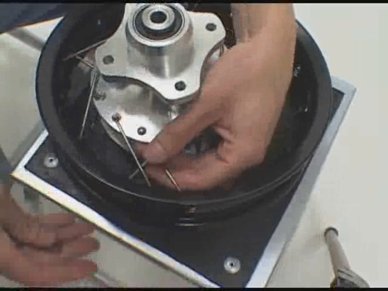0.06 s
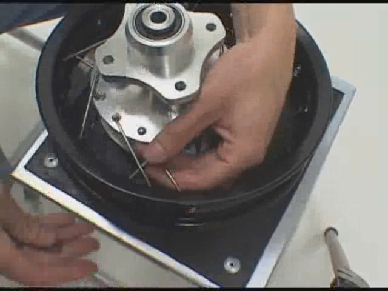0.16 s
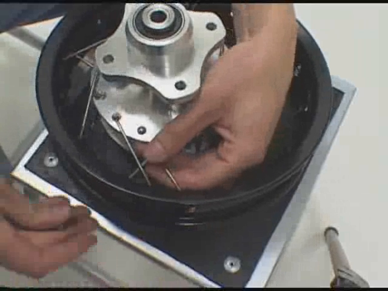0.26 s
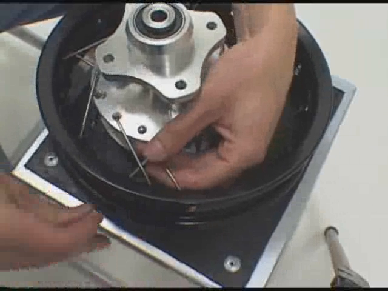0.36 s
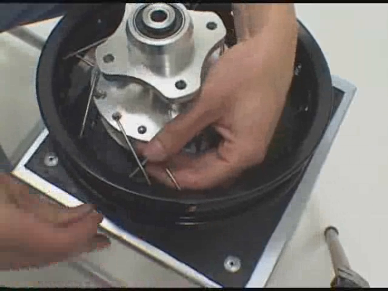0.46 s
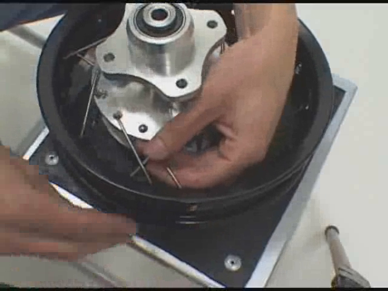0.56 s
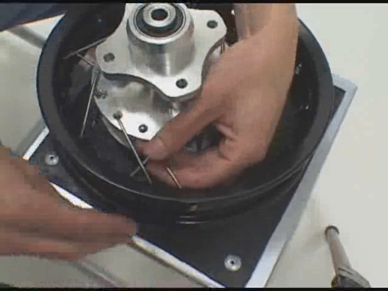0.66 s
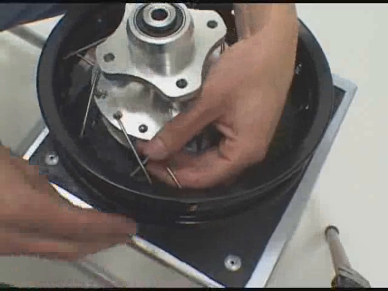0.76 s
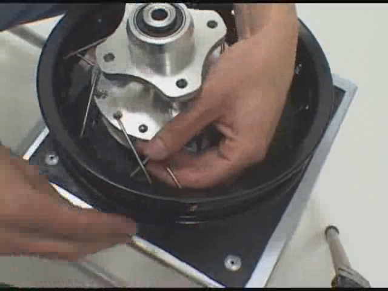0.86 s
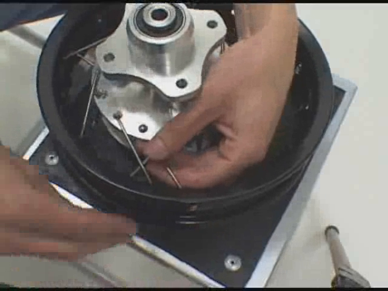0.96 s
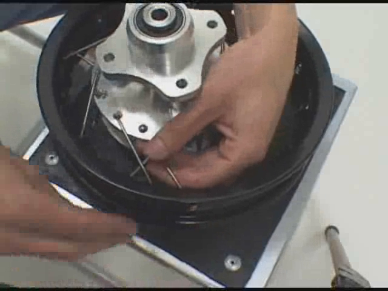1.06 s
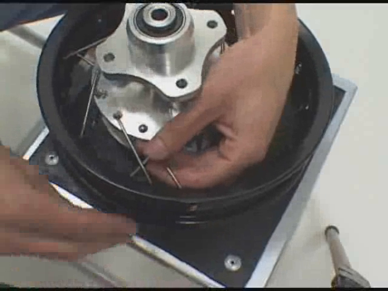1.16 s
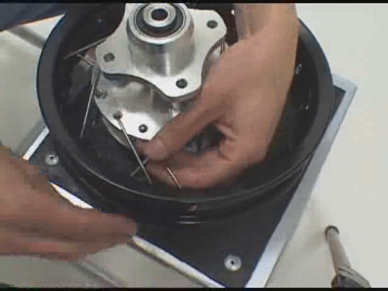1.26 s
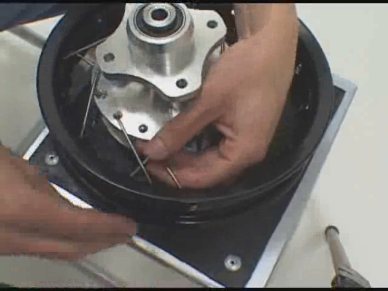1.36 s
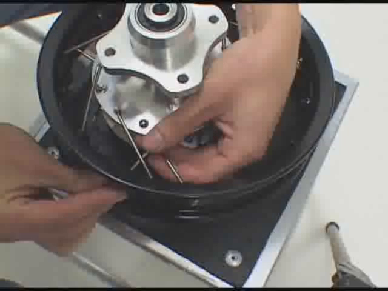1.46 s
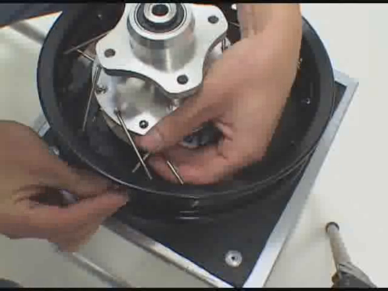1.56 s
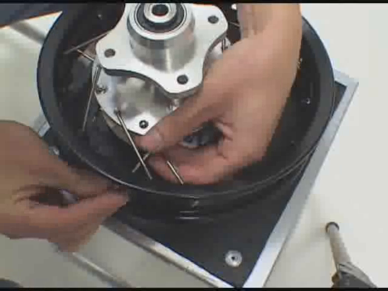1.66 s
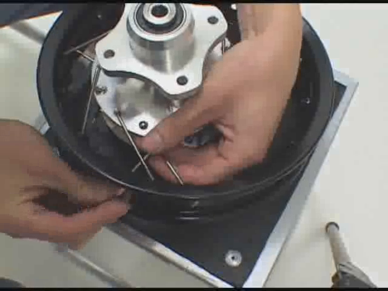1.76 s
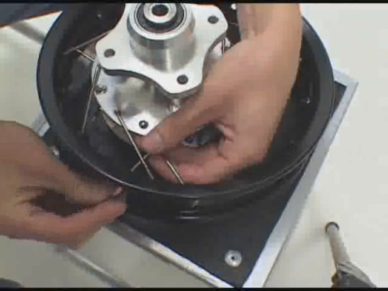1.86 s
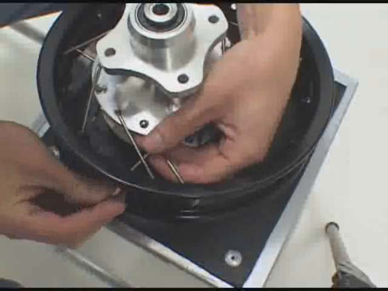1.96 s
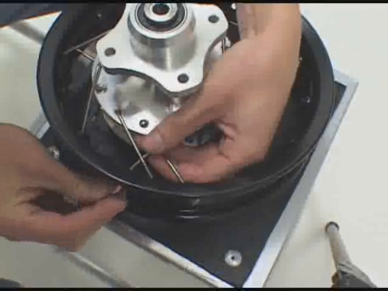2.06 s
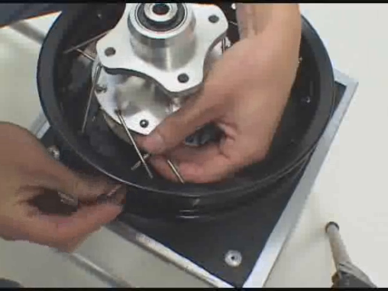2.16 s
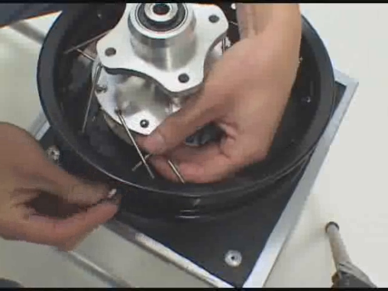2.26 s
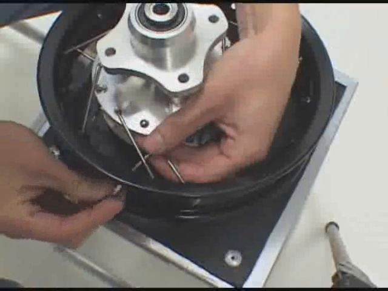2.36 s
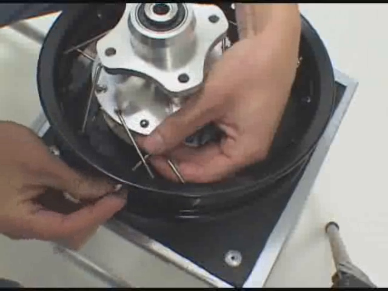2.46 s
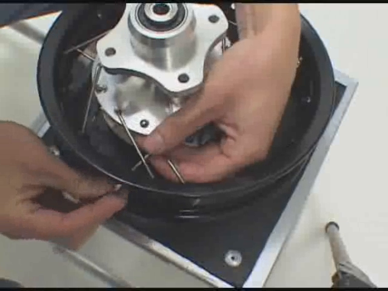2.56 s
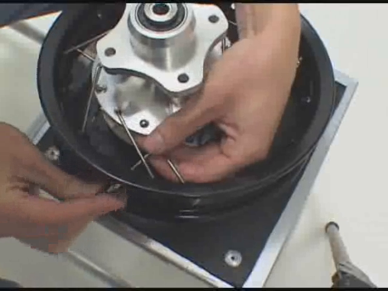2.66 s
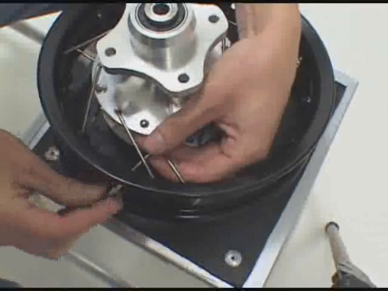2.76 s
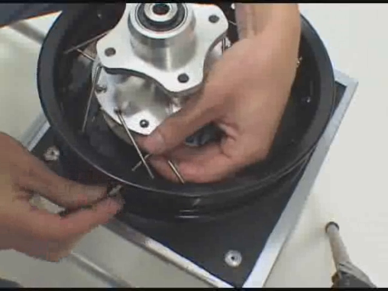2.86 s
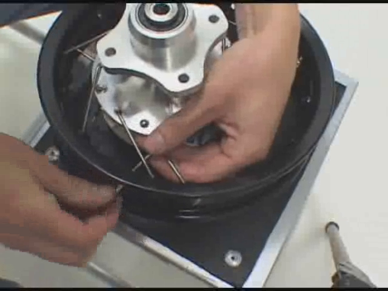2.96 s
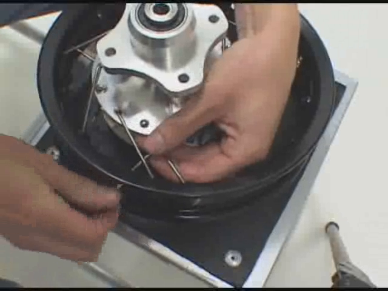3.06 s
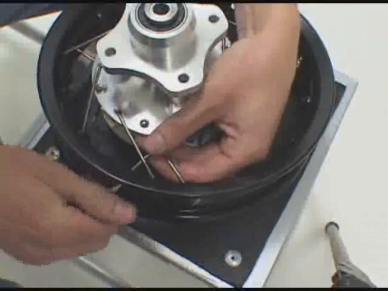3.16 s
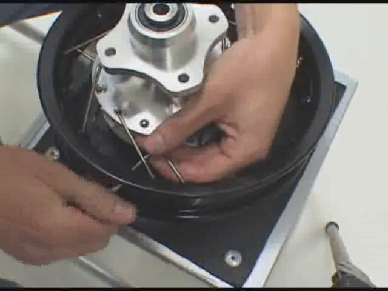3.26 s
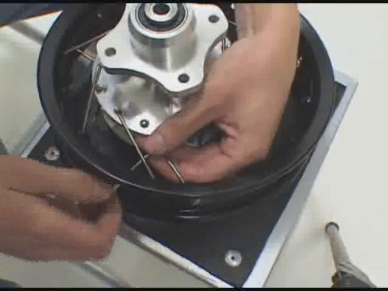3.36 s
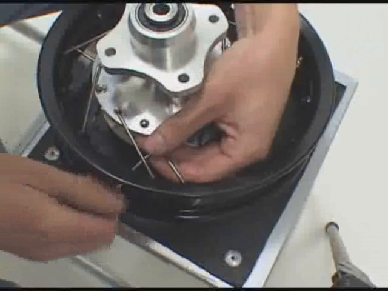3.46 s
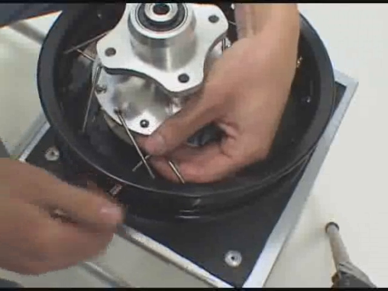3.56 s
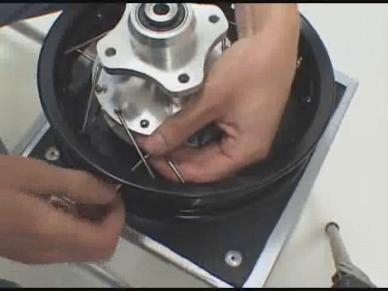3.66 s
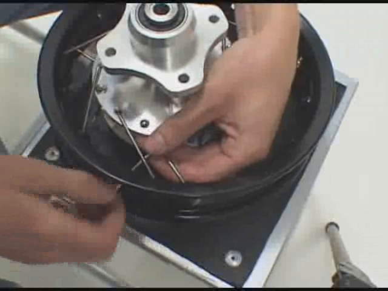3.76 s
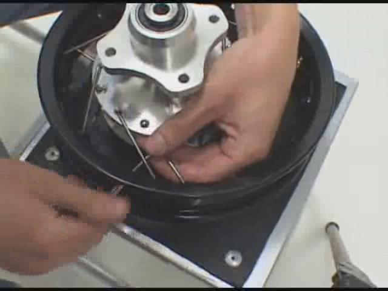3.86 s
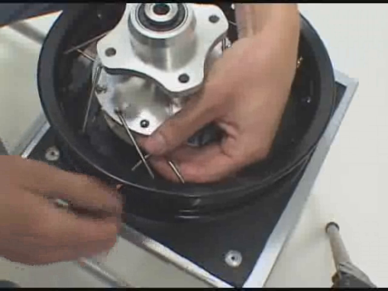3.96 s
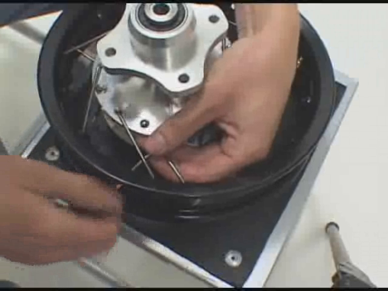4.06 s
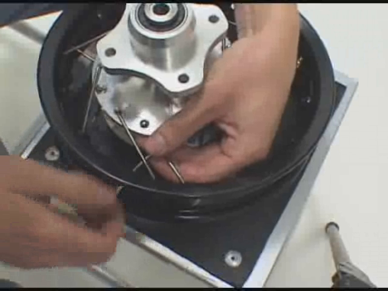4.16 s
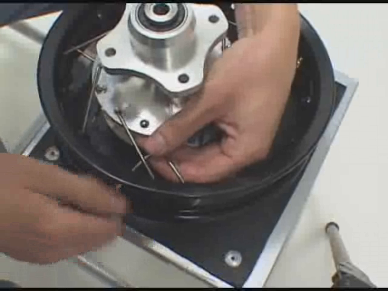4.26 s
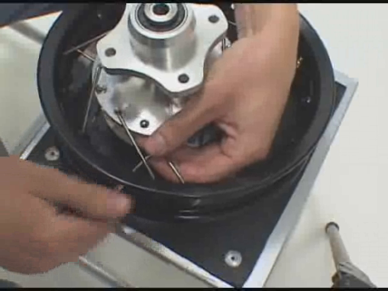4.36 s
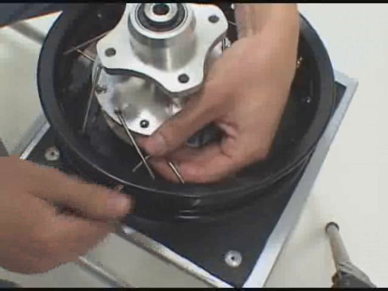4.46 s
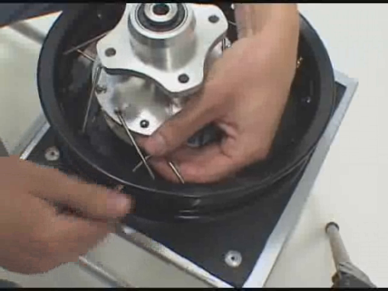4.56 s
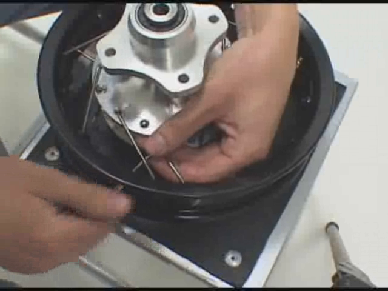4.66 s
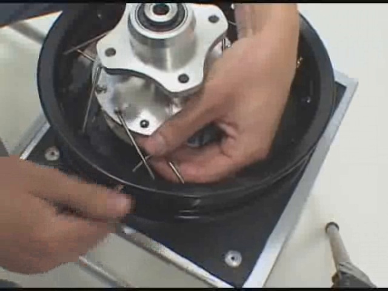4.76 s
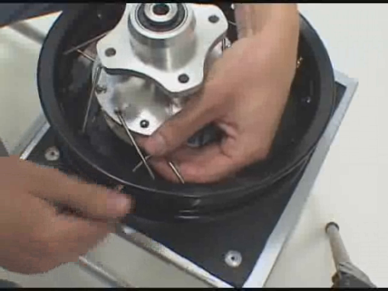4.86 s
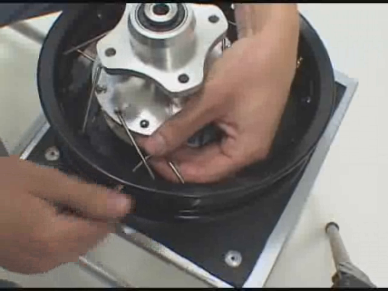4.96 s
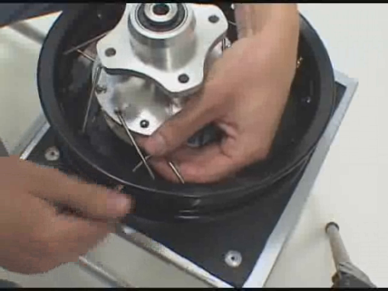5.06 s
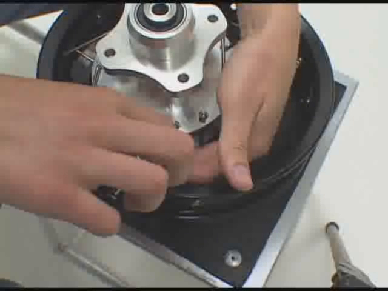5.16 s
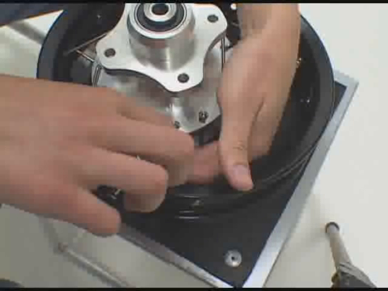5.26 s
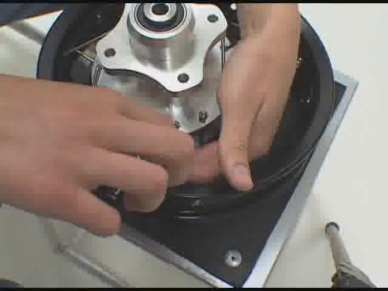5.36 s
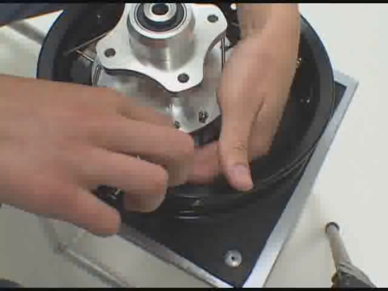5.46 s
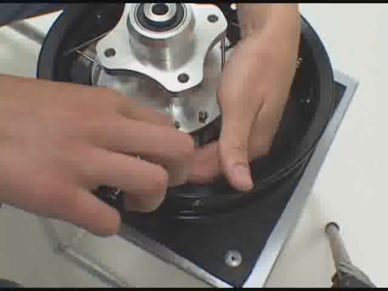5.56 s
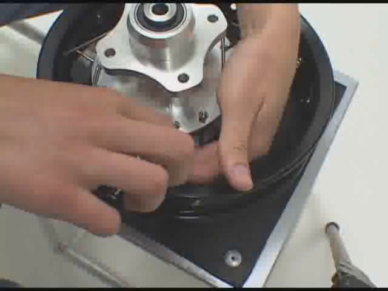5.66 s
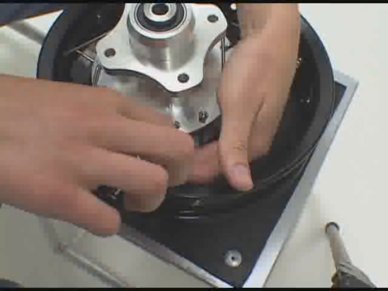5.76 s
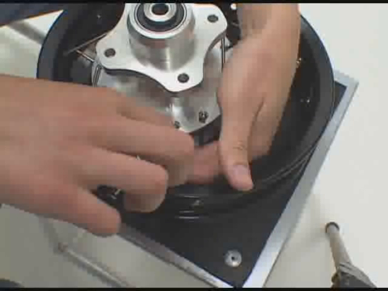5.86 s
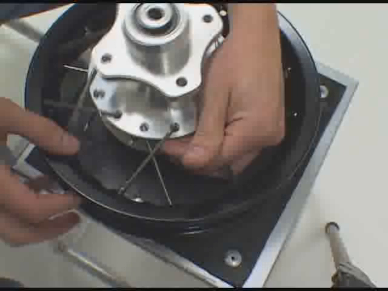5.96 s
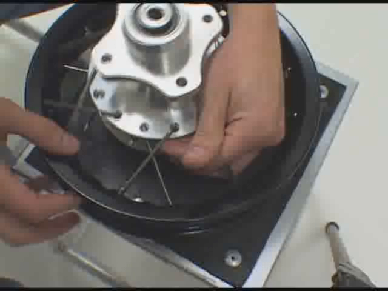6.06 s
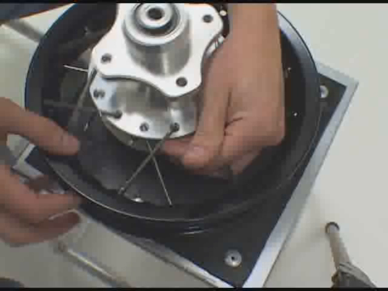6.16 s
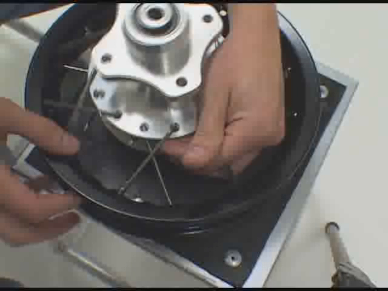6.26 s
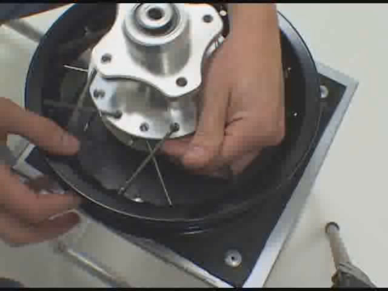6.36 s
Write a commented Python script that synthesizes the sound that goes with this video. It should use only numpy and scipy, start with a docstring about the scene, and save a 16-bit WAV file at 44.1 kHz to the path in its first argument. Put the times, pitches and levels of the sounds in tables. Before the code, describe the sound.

In a small workshop with steady low ventilation rumble and a faint hum, thin steel spokes are fitted close to the microphone. After a quiet start come light, irregular ticks and tiny scrapes with short, bright metallic rings. Near the end the wheel is knocked with a dull thump, dragged round, and its loose spokes rattle sharply.

```python
"""Ventilation rumbles and hums in a workshop: coloured noise plus wavering sines.
Then steel spokes are fitted between hub and rim of a small wheel on a stand. A nipple turned onto its
thread ticks (noise bursts) and scrapes (random clicks); the rim rings (decaying mode pairs).
At the end the wheel is knocked (push pulses), dragged round (dull noise), and the loose spokes rattle."""
import sys
import numpy as np
from scipy import signal
from scipy.fft import rfft, irfft, next_fast_len
from scipy.io import wavfile

SR = 44100
rng = np.random.default_rng(int(sys.argv[2]) if len(sys.argv) > 2 else 0)


def int16_out(signal):
    """Quantize to a 16-bit WAV file."""
    q = np.round(np.clip(np.atleast_2d(signal).T, -1, 1) * 32767)
    wavfile.write(sys.argv[1], SR, q.astype(np.int16))


N = 282769

# Room noise spectrum: (frequency [Hz], relative density [dB per Hz])
AIR_SPECTRUM = [(12, -38), (20, -5.5), (125, -1), (147, -7), (226, -9), (387, -19.5), (455, -18),
                (493, -43), (535, -22), (580, -22), (801, -26), (1530, -34), (4870, -35), (11500, -38),
                (12500, -42), (16200, -83), (22000, -120)]
# Room noise left-right correlation: (frequency [Hz], correlation [-1..1])
AIR_LIKENESS = [(60, 0.79), (170, 0.87), (500, 0.53), (1450, 0.66), (4180, 0.069), (12100, 0.045)]
# Fan tones: (frequency [Hz], mean sine level [dB])
FAN_TONES = [(120, -48), (269.2, -62), (538.3, -59.5), (1071, -71.5)]
# Bounce off the bench, left row then right row: (delay [s], level [dB])
BENCH_ECHO = [(.00031, -23), (.00052, -30)]
# Stand modes: (frequency [Hz], relative level [dB], t60 [s])
STAND_MODES = [(38.2, 3, 0.092), (143, -25, 0.024), (321, -59, 0.032), (687, -20, 0.043)]
# Wheel bumps its stand: (time [s], push peak [dB], contact [s])
STAND_BUMPS = [(5.594, -34, .002), (5.6052, -22, .0017), (5.6105, -29, .012), (5.611, -17, .0011),
               (5.614, -24, .003), (5.641, -26, .002), (5.785, -30, .002), (5.974, -30, .003),
               (6.217, -36, .0016)]
# Wheel dragged on its stand: (time [s], rumble level [dB])
DRAG_CURVE = [(5.64, -44), (5.662, -49), (5.838, -39.5), (5.89, -57), (5.98, -36.5), (6.006, -45),
              (6.298, -65), (6.398, -50), (6.41, -61)]
# Thread and spokes scraping, one list under the fingers, one as the wheel turns: (time [s], level [dB])
SCRAPE_CURVES = [
    [(0.7, -76.5), (1.67, -50.5), (2.01, -84), (2.62, -64.5), (2.92, -63.5), (3.9, -60), (3.98, -59.5),
     (4.17, -73), (4.61, -62), (4.76, -69.5), (5.43, -71.5), (5.59, -76)],
    [(5.6, -50), (5.726, -26.5), (5.778, -28.5), (5.906, -40.5), (5.988, -30), (6.166, -45.5), (6.306, -57),
     (6.41, -35.5)],
]
# Scrape colour: (frequency [Hz], relative density [dB per Hz])
SCRAPE_SPECTRUM = [(530, -59), (900, -37), (1560, -46), (1840, -12), (2860, -58), (3890, -12), (4900, -7.5),
                   (9290, -43), (11000, 26), (12100, 33), (12500, -23), (16200, -58), (22000, -120)]
# Rim and hub modes: (frequency [Hz])
RIM_HZ = [1838, 2320, 2735, 3108, 3557, 4330, 4391, 4600, 5232, 5607, 5701, 5862, 6078, 6200, 6820, 7200,
          7286, 7855, 8040, 8330, 8720, 9274, 9606, 10116, 10330, 11125, 11645]
# The same modes in the same order: (relative level [dB], t60 [s])
RIM_MODES = [(-3.5, 0.086), (-3, 0.02), (-17.5, 0.042), (-17, 0.17), (-5, 0.087), (-9.5, 0.21),
             (-2.5, 0.25), (-4.5, 0.074), (-13, 0.17), (-12.5, 0.18), (-1.5, 0.019), (-1.5, 0.074),
             (-17.5, 0.39), (-6.5, 0.079), (-9, 0.11), (-7.5, 0.018), (-12.5, 0.27), (-8.5, 0.16),
             (-4.5, 0.054), (0.5, 0.047), (1.5, 0.073), (1.5, 0.047), (-6.5, 0.19), (-9, 0.17), (-35, .08),
             (-13, 0.18), (3.5, 0.12)]
# Where the deep, middle and bright rings lie: (frequency [Hz])
RING_HZ = (1840, 4400, 6000)
# Metal touches: (time [s], relative peak [dB], tick centre [Hz],
#   deep, middle, bright ring re tick, relative [dB] each, left minus right [dB])
TOUCHES = [(0.8105, -43.5, 4650, -12, -17, -26, 10), (0.9425, -40.5, 6100, -13, -14, -24, -10),
           (0.982, -35, 5900, -21, -15, -19, .5), (1.0725, -22.5, 7950, -28.5, -28.5, -28, 8),
           (1.135, -36.5, 5700, -18, -30, -35, 7), (1.2282, -16, 4320, -19.5, -20, -18, 3.5),
           (1.314, -25, 4550, -21.5, -31, -27, 3), (1.3695, -28, 6300, -42, -38, -31, -.5),
           (1.4149, -2.5, 4900, -27.5, -13.5, -18, 7.5), (1.6205, -21, 4320, -16, -19, -9.5, 0),
           (1.692, -22.5, 4630, -16, -30, -28, 5), (1.7906, -15, 9100, -27, -42, -17, -3),
           (1.805, -21.5, 8450, -36, -27, -41, 1), (1.842, -17, 4730, -23.5, -24, -20.5, 3),
           (1.8525, -22, 7500, -24, -37, -34, -2), (1.8966, -31, 4450, -37, -30, -17, -2),
           (1.9596, -38.5, 4630, -20, -19, -13.5, -8), (2.0905, -4.5, 8500, -34, -34, -31, 2),
           (2.1261, -9, 7600, -29, -32.5, -27, 0), (2.2511, -29.5, 8290, -40, -36, -29, 0),
           (2.2998, -24.5, 8800, -39, -21, -23, -7), (2.3105, -18.5, 4470, -14, -14.5, -13.5, -2),
           (2.351, -18, 5900, -30, -25, -21.5, 1), (2.44, -15, 8200, -47, -30, -22.5, 1),
           (2.4577, -7, 8200, -64, -41, -29.5, 0), (2.4692, -20, 4500, -31, -24, -25, 1),
           (2.4936, -20, 8300, -37, -30, -25, 1), (2.5234, -15, 8200, -50, -40, -31, 0),
           (2.5431, -20.5, 8260, -36, -35, -41, 0), (2.578, -12.5, 7600, -45, -53, -37, .5),
           (2.6595, -8.5, 7300, -47, -46, -32, 1.5), (2.7242, -14, 7260, -34, -36, -24, 0),
           (2.7526, -21.5, 4500, -15.5, -18, -18, -1), (2.809, -10, 8200, -61, -51, -30.5, 3),
           (2.985, -27.5, 6200, -32, -26, -26, 3), (3.0889, -38.5, 3640, -15, -14.5, -15.5, 1),
           (3.1936, -32.5, 6980, -23, -26, -23, .5), (3.2258, -21, 8300, -30, -41, -38, 0),
           (3.254, -32, 4320, -22, -20.5, -28, 2), (3.314, -29, 6000, -22, -23, -22, 1.5),
           (3.325, -11.5, 6100, -25, -32, -30, 5), (3.4793, -27.5, 4400, -18.5, -19, -44, 0),
           (3.5562, -30.5, 3600, -22, -14, -12.5, 6), (3.5935, -30, 5810, -19, -34, -33, 1),
           (3.6234, -15, 5750, -21.5, -34, -21, -1), (3.7787, -27.5, 8580, -16, -34, -14.5, 5),
           (3.7969, -5.5, 4100, -25.5, -27, -21.5, 4.5), (3.8536, -19.5, 7330, -15, -22, -20.5, 1),
           (3.902, -3.5, 7140, -36, -30.5, -26, 3), (4.0474, -19, 6370, -38, -35, -16.5, 3),
           (4.0757, -20, 8900, -27, -20, -17, 18), (4.125, -15.5, 3800, -12.5, -27.5, -21.5, 2),
           (4.315, -28.5, 6870, -29, -19, -21, 11), (4.33, -22, 6650, -31, -32, -22.5, 6),
           (4.36, -24, 5610, -23, -22, -19.5, 9), (4.4112, -18.5, 4640, -21, -19.5, -21, 3),
           (4.5578, -18.5, 8310, -39, -30, -24, -2), (4.565, -16, 5860, -41, -29.5, -27, 0),
           (4.573, -9, 4570, -19.5, -30, -20, 3), (4.5977, -23, 4390, -40, -24, -11, 0),
           (4.6303, -15.5, 8300, -31, -32, -40, -1), (4.6394, -16.5, 5500, -18, -19, -13, 8),
           (5.0614, -10.5, 6600, -30.5, -26, -21.5, -2), (5.3256, -28, 9400, -30, -40, -40, -4),
           (5.4122, -14.5, 8630, -43.5, -54, -24.5, 6), (5.4151, -1.5, 10500, -49, -66, -49, -2),
           (5.5197, 1.5, 10200, -48, -56, -40, -.5), (5.5734, -21, 9300, -25, -40, -22, -2),
           (5.6054, -6, 9600, -25, -35, -40, 18), (5.6106, 9, 9600, -55, -47, -31, 0),
           (5.6205, -23, 8040, -61, -39, -32, .5), (5.6229, -0.5, 6790, -63, -44, -32, 11),
           (5.6292, -9, 9350, -48, -35, -14, -4), (5.654, -4, 7200, -53, -30, -24.5, -3),
           (5.688, -21, 8090, -49, -40, -13, 1.5), (5.6934, -32, 9250, -40, -33, 2, -5),
           (5.7068, -3, 5660, -31, -14.5, -19.5, -4), (5.7636, -21, 5800, -40, -11, -15, -6),
           (5.8, -19.5, 5900, -31, -13, -6, -4), (5.8112, -15, 5950, -14.5, -4.5, -11.5, -6),
           (5.8255, -7.5, 6000, -29, -25, -17, 11), (5.896, -16, 7900, -40, -40, -16, .5),
           (5.9653, -12.5, 6140, -34, -21, -20, 0), (5.983, -10.5, 8000, -38, -13, -16, 0),
           (6.0372, -8, 6200, -43, -16.5, -16, -.5), (6.054, -19, 4700, -51, -10, -10, -2),
           (6.0909, -2.5, 8100, -43, -31, -35, 10), (6.0946, -4.5, 9200, -39, -45, -20, -4),
           (6.1054, -12.5, 7940, -42, -35, -15, 0), (6.1655, -20, 4700, -33, -14.5, -11.5, -3),
           (6.265, -10.5, 9300, -39, -44, -33, 0), (6.2899, -24.5, 5610, -17, -26, -19, -.5),
           (6.3252, -13, 7500, -42, -53, -15.5, -2), (6.3541, -17.5, 4950, -49, -10.5, -13, -2),
           (6.369, -5, 8160, -33, -52, -25, -2)]

AIR_DB = -45
ROOM_T60_S, ROOM_DB = 0.39, -17.5   # t60 at the lowest frequencies
ROOM_T60_HALVED_HZ = 9900
SCRAPE_PER_S, SCRAPE_WAVER_DB = 2000, 3   # uneven pressure
RIM_SHARE_DB = 5.5   # share of the slips that reaches the rim
FOCUS_DB_PER_OCTAVE = 5   # bright modes far from a tick's centre are struck less
TICK_T60_S, SHIMMER_T60_S = 0.014, 0.17
TREBLE_ROLL_OFF_HZ, TOP_STOP_HZ = 9260, 12900


def from_db(db):
    """Decibels to gain."""
    return 10 ** (np.asarray(db) / 20)


def rms_one(x):
    """Scale to rms 1."""
    return x / np.sqrt(np.mean(x ** 2) + 1e-20)


def level_curve_db(rows):
    """Level table at every sample; -120 dB ahead of the first row."""
    s, level_db = np.transpose(rows)
    return np.interp(np.arange(N) / SR, s, level_db, left=-120)


def at_hz(points, hz):
    """Read a spectrum table on a log-frequency axis."""
    table_hz, values = np.transpose(points)
    return np.interp(np.log(hz), np.log(table_hz), values)


def sides(pan_db):
    """Left and right gains for a left-right level step."""
    return from_db(np.multiply.outer([.5, -.5], pan_db))


def band_pass(x, edges_hz, order=2):
    """Butterworth band-pass."""
    return signal.sosfilt(signal.butter(order, edges_hz, "band", fs=SR, output="sos"), x)


def drift(rate_hz):
    """Slow chance of spread 1: noise through a double pole, run at every 40th sample."""
    r = np.exp(-2 * np.pi * rate_hz * 40 / SR)
    noise = rng.standard_normal(N // 40 + 2002)
    slow = signal.lfilter([1], [1, -2 * r, r * r], noise)[2000:]   # settled part
    return np.interp(np.arange(N) / 40, np.arange(len(slow)), rms_one(slow))


def ring(clicks, hz, t60_s, phase_rad=0):
    """A unit click sets a decaying sine of height 1 ringing, starting at the given phase."""
    r = from_db(-60 / (t60_s * SR))
    w = 2 * np.pi * hz / SR
    onset = [np.sin(phase_rad), r * np.sin(w - phase_rad)]
    return signal.lfilter(onset, [1, -2 * r * np.cos(w), r * r], clicks + 1e-18)


def coloured(sources, spectrum, likeness, lowest_hz):
    """Third-octave bank; sources hold (mid, side) pairs dealt in turn to the bands; rms 1."""
    out = 0
    edges_hz = lowest_hz * 2 ** np.arange(0, np.log2(14000 / lowest_hz), 1 / 3)
    for k, (low, high) in enumerate(zip(edges_hz, edges_hz[1:])):
        mid, side = band_pass(sources[k % len(sources)], [low, high])
        hz = np.sqrt(low * high)
        alike = np.clip(at_hz(likeness, hz), -1, 1)
        pair = np.sqrt(1 + alike) * mid + np.sqrt(1 - alike) * side * [[1], [-1]]
        out = out + from_db(at_hz(spectrum, hz)) * pair
    return rms_one(out)


def ventilation():
    """Broad rumble and hiss, with fan tones wavering slightly in level and phase."""
    noise = rng.standard_normal((2, 2, N))
    air = from_db(AIR_DB) * coloured(noise, AIR_SPECTRUM, AIR_LIKENESS, 19.96)
    t = np.arange(N) / SR
    tones = np.zeros(N)
    for hz, level_db in FAN_TONES:
        gain = from_db(level_db + 1.7 * drift(5.2))
        tones += gain * np.sin(2 * np.pi * hz * t + 0.68 * drift(2.17))
    return (air + tones) * sides(0.82)[:, None]


def workshop(x):
    """Room echo: ten feedback delays a side, duller on every round."""
    size = next_fast_len(N + SR)
    hz = np.fft.rfftfreq(size, 1 / SR)
    response = np.zeros((2, len(hz)), complex)
    for k, lag_s in enumerate(rng.uniform(0.0074, 0.033, 20)):
        loss_db = 60 * lag_s * (1 + hz / ROOM_T60_HALVED_HZ) / ROOM_T60_S
        loop = from_db(-loss_db) * np.exp(-2j * np.pi * hz * lag_s)
        response[k % 2] += loop / (1 - loop) * (-1) ** (k // 2)
    return irfft(response * rfft(x, size), size)[:, :N]


def bench(x):
    """Direct sound plus one early bounce, a little later on one side than on the other."""
    now = np.arange(N)
    heard = []
    for direct, (late_s, level_db) in zip(x, BENCH_ECHO):
        bounce = np.interp(now - late_s * SR, now, direct, left=0)
        heard.append(direct + from_db(level_db) * bounce)
    return np.array(heard)


def wheel_on_stand():
    """Soft bumps push the air and shake the stand; dull rubbing while the wheel is dragged round."""
    t, push = np.arange(N) / SR, np.zeros(N)
    for s, peak_db, contact_s in STAND_BUMPS:
        stroke = np.clip((t - s) / contact_s, 0, 1)
        push += from_db(peak_db) * np.sin(2 * np.pi * stroke)   # out and back
    shake = np.zeros(N)
    for hz, level_db, t60_s in STAND_MODES:
        shake += from_db(level_db) * 2 * np.pi * hz / SR * ring(push, hz, t60_s)
    noise = band_pass(rng.standard_normal(N), [180, 1300])
    # the stand's upper modes colour the rubbing
    resonance = sum(rms_one(ring(noise, hz, t60_s)) for hz, _, t60_s in STAND_MODES[2:])
    rub = rms_one(noise) + from_db(-4.0) * resonance
    return push + shake + from_db(level_curve_db(DRAG_CURVE)) * rms_one(rub)


def grains():
    """Uneven slips of metal on metal: random clicks of widely spread size, rms 1."""
    sizes_db = 4 * np.minimum(rng.exponential(1, N), 4)
    sizes = from_db(sizes_db) * rng.choice([-1, 1], N)
    return rms_one(sizes * (rng.random(N) < SCRAPE_PER_S / SR))


def scrape(slips):
    """Slips of thread and spokes, coloured by band; the treble is the widest; rms 1."""
    pair = np.array([slips, np.roll(grains(), 99)])
    return coloured([pair], SCRAPE_SPECTRUM, [(1000, 0.93), (4000, 0.18)], 871.5)


def rim(slips):
    """Touches (a few quick bounces each) and slips strike every mode of the wheel."""
    touches, out = np.array(TOUCHES), np.zeros((2, N))
    peak_db, centre_hz = touches[:, 1], touches[:, 2]
    blows, step_s = 3, .0025
    steps = rng.uniform(.4, 1.6, (len(touches), blows)).cumsum(axis=1)
    late_s = step_s * steps * (np.arange(blows) > 0)   # first blow on time
    at = np.minimum(np.round((touches[:, :1] + late_s) * SR).astype(int), N - 1)
    blow_fade = from_db(-7.0 * np.arange(blows))
    signs = rng.choice([-1, 1], N)
    luck = rng.standard_normal((len(touches), len(RIM_MODES), 2, 1 + blows))
    for k, (hz, (level_db, t60_s)) in enumerate(zip(RIM_HZ, RIM_MODES)):
        struck_db = np.array([at_hz(list(zip(RING_HZ, row[3:6])), hz) for row in touches])
        struck_db -= FOCUS_DB_PER_OCTAVE * np.abs(np.log2(hz / centre_hz)) * (hz > RING_HZ[1])
        reach = min(hz / 4000, 1)   # slips are too brief to move the low modes much
        slip_gain = reach ** 1.63 * np.sqrt(1 / (t60_s * SR))
        for half in range(2):   # a nearly round wheel splits each mode into strong and weak halves that beat
            clicks = slips * slip_gain * np.roll(signs, 977 * (2 * k + half))
            blow = from_db(peak_db + struck_db + 3.0 + 3.0 * luck[:, k, half, 0])
            np.add.at(clicks, at, blow[:, None] * np.sign(luck[:, k, half, 1:]) * blow_fade)
            lead_rad = 0.64 * reach * (1 - 2 * half)   # the halves face different sides
            pitch_hz = hz * (1 + 0.0035 * half * (-1) ** k)
            grip_db = 3.1 * drift(13.5)   # hands and loose spokes lean on the wheel: each ring wavers
            pair = np.array([ring(clicks, pitch_hz, t60_s, lead) for lead in (lead_rad, -lead_rad)])
            out += from_db(level_db - 4.24 * half + grip_db) * pair
    return out * sides(0.48)[:, None]


def ticks():
    """Each touch: a short burst in a broad spoke resonance, then the dense shimmer of all loose spokes."""
    length = 8192
    out, t = np.zeros((2, N + length)), np.arange(length) / SR
    attack = 1 - np.exp(-t / 0.00082)
    noise = rng.standard_normal((len(TOUCHES), 2, length))
    for (s, peak_db, hz, *_, bright_db, pan_db), (mid, side) in zip(TOUCHES, noise):
        raw = mid * attack * from_db(-60 * t / TICK_T60_S)
        edges_hz = np.clip([hz * 2 ** -0.78, hz * 2 ** 0.78], 300, 15000)
        burst = band_pass(raw, edges_hz) + from_db(-14.5) * band_pass(raw, [1300, 11000], 1)
        shimmer = band_pass([mid + side, mid - 0.62 * side], [2600, 10000])
        shimmer = shimmer * from_db(bright_db + 3.0 - 60 * t / SHIMMER_T60_S)
        touch = burst / np.abs(burst).max() + shimmer
        i = round(s * SR)
        out[:, i:i + length] += from_db(peak_db - 6.5) * sides(pan_db)[:, None] * touch
    return out[:, :N]


def scene():
    """Wheel close by, its bench bounce and room echo, and the room's own noise."""
    scrape_db = level_curve_db(np.concatenate(SCRAPE_CURVES)) + SCRAPE_WAVER_DB * drift(19)
    slips = grains()
    wheel = wheel_on_stand() + from_db(scrape_db) * scrape(slips)
    wheel += rim(slips * from_db(scrape_db + RIM_SHARE_DB))
    wheel += ticks()
    return ventilation() + from_db(ROOM_DB) * workshop(wheel.mean(axis=0)) + bench(wheel)


def record(dry):
    """The highest treble is dull, full scale clips the peaks, the top is cut."""
    dulled = signal.sosfilt(signal.butter(4, TREBLE_ROLL_OFF_HZ, fs=SR, output="sos"), dry)
    top_cut = signal.cheby2(10, 50, TOP_STOP_HZ, fs=SR, output="sos")   # 50 dB down from TOP_STOP_HZ
    return signal.sosfilt(top_cut, np.clip(dulled, -1, 1))


dry = scene()
out = record(dry)
int16_out(out)
```